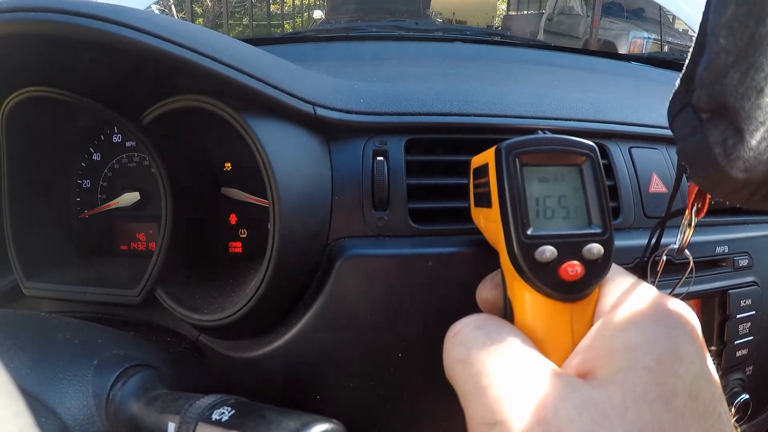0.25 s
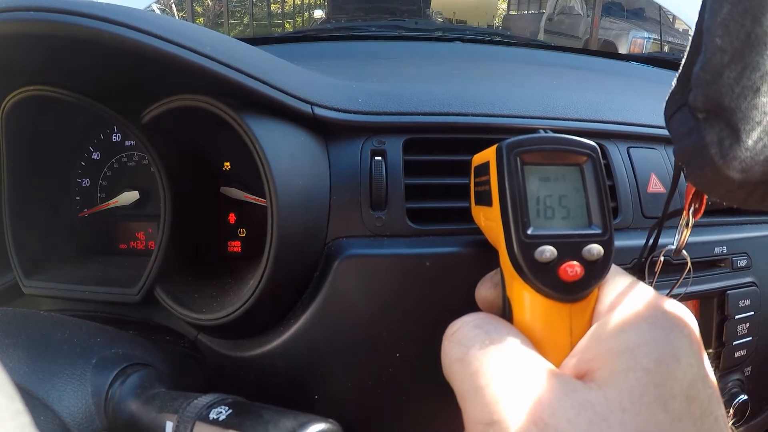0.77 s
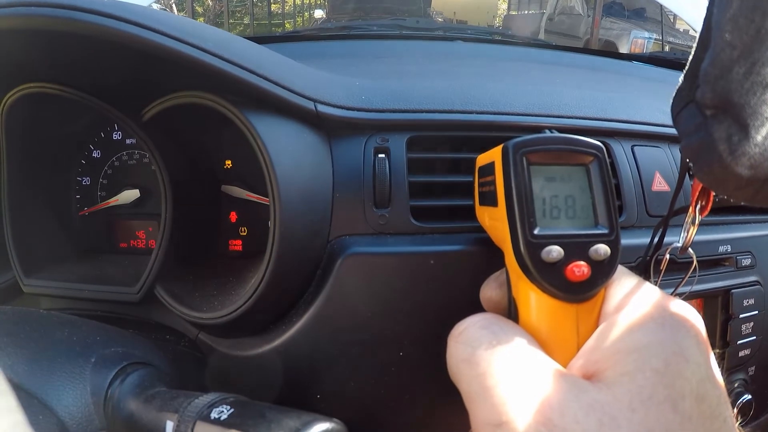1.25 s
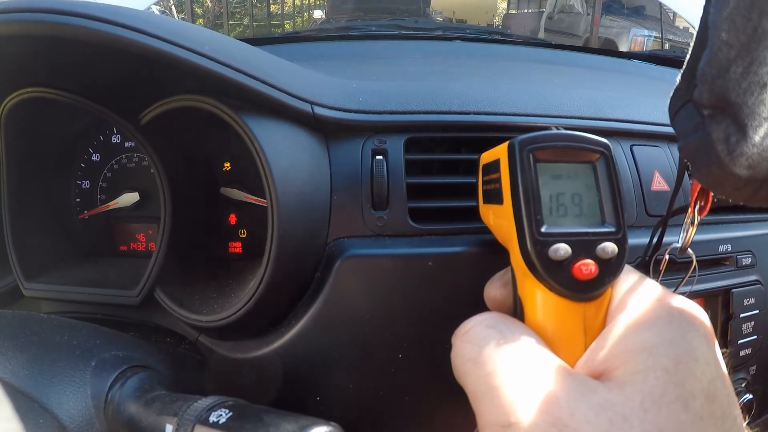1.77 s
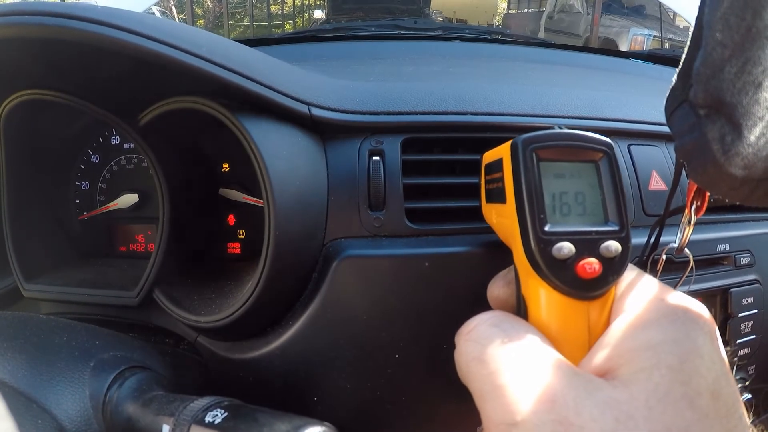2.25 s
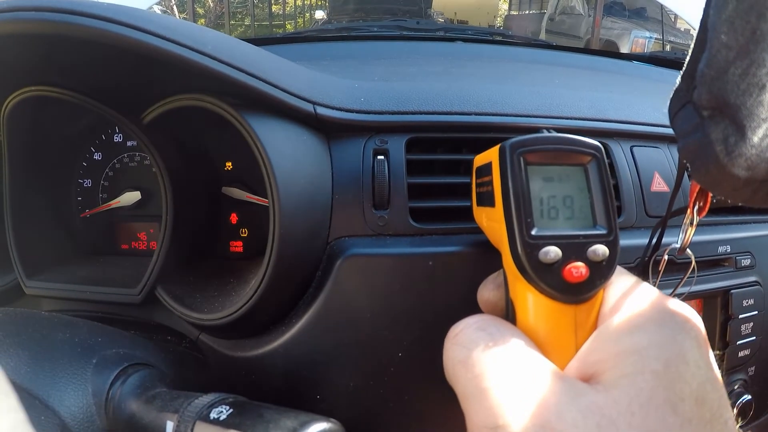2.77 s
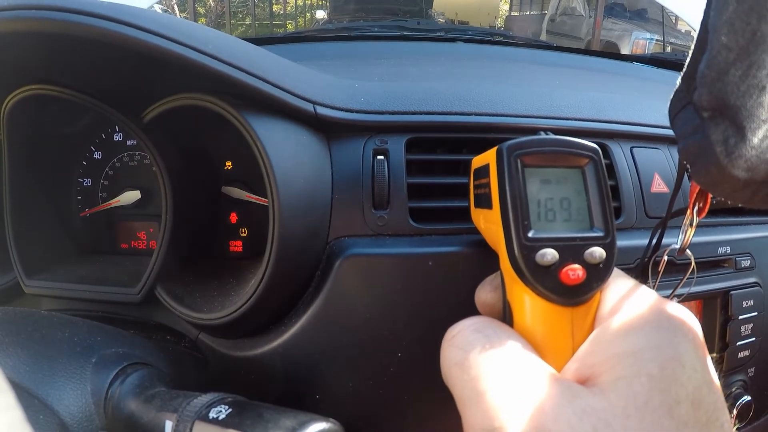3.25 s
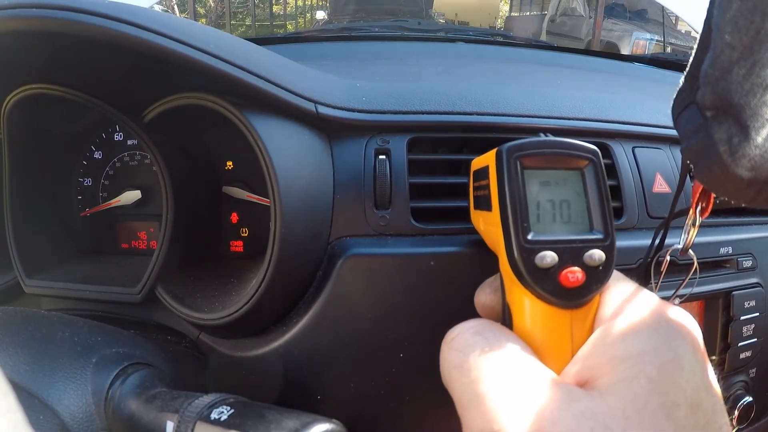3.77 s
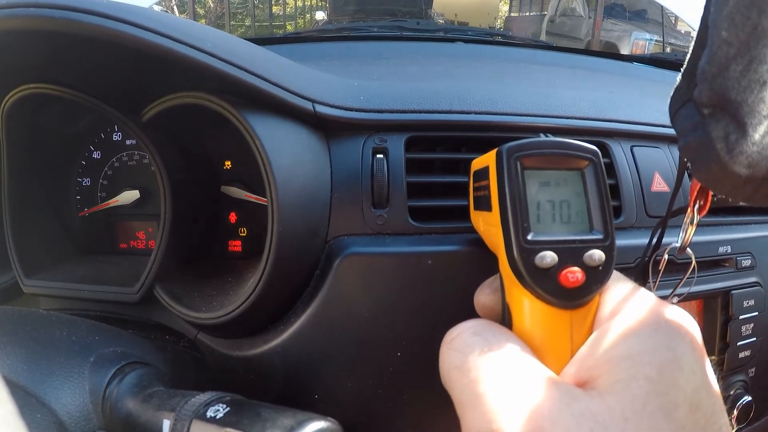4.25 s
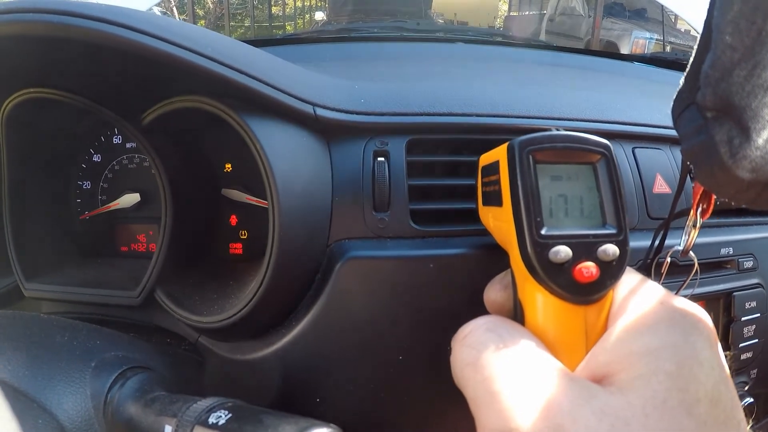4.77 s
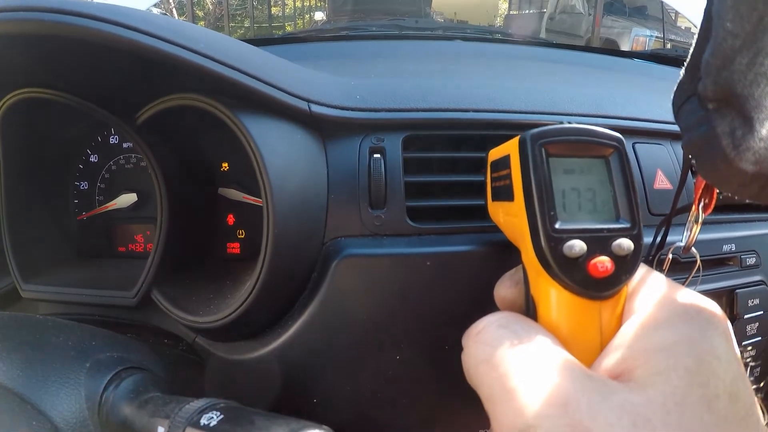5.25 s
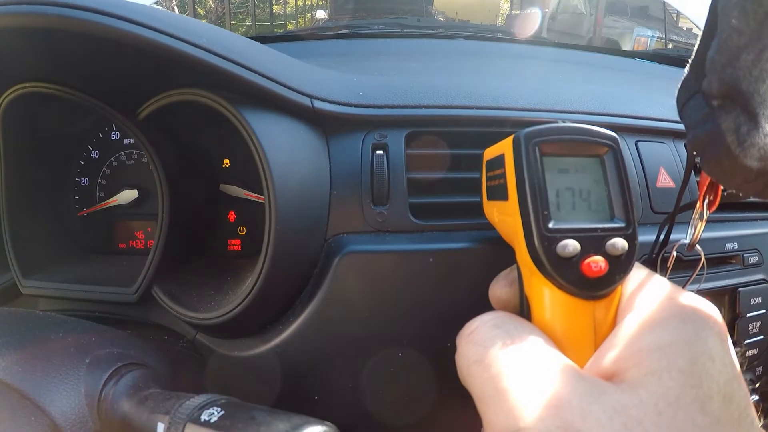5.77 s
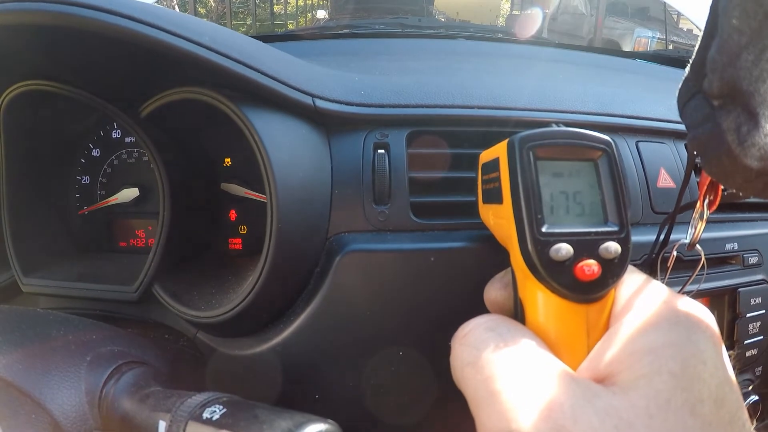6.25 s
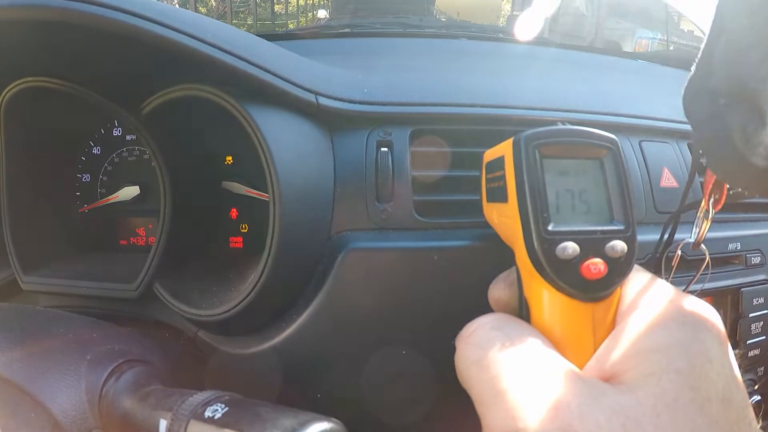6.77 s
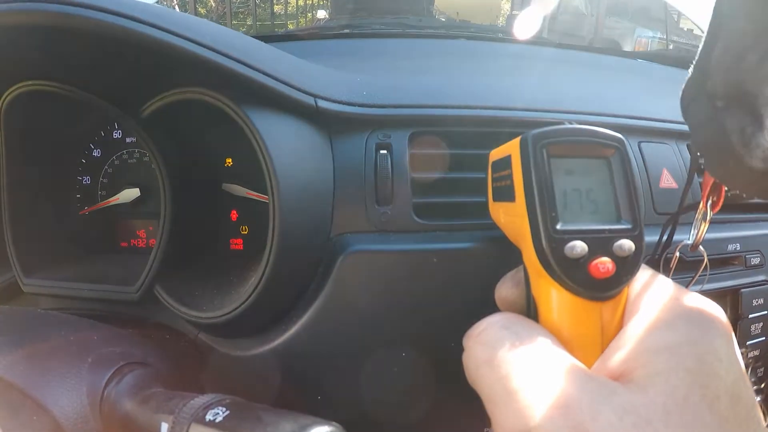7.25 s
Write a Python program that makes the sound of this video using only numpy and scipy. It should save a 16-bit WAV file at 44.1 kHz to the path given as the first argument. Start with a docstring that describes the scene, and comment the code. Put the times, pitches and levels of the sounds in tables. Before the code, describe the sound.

A car heater fan blows on high for about 7.5 seconds, already running at the start and cut off still running. The airstream strikes a close microphone: a loud, deep, uneven rumble, mostly below 100 Hz, squashed on its swells, with ragged fluttering around 150 to 400 Hz. A dense burst of hard puffs and thumps opens the first 0.15 s. From 0.2 to 2 s scattered dull pops continue, thinning near 2 s. Buffeting builds from 2.3 s and is thickest at 2.8 to 4.4 s, with heavy thumps around 3.5 to 4 s. It calms from 4.7 to 5.6 s, then flutters again, with sharper gusts near 6.3, 6.7 and 6.9 s, and fades back at the end. Constantly beneath: a steady blower hum near 123 Hz with faint higher tones, smooth soft vent hiss, a barely perceptible thin whistle and a tiny treble motor buzz. Dry, mono, enclosed cabin.

```python
"""Inside a parked car the heater fan runs on high, and air from a dash vent buffets the microphone.
The air stream is shaped noise: a swaying rumble and ragged eddies, with single puffs (crack on thump).
The blower hums as sines on its shaft orders, each wavering in level. The vents hiss as filtered noise
with a faint whistle, and a small motor ticks in the treble as decaying spits of noise."""
import sys
import numpy as np
from scipy import signal
from scipy.fft import rfft, irfft, next_fast_len
from scipy.io import wavfile
from scipy.ndimage import uniform_filter1d, minimum_filter1d

SR = 44100
rng = np.random.default_rng(int(sys.argv[2]) if len(sys.argv) > 2 else 0)


def put_to_file(sound):
    """Save the sound as 16-bit audio at rate SR, in the file named by the first command-line argument."""
    columns = np.atleast_2d(sound).T  # one column per channel
    safe = np.clip(columns, -1, 1)
    whole_steps = np.round(safe * 32767)
    wavfile.write(sys.argv[1], SR, whole_steps.astype(np.int16))


N = 331632  # length in samples

# air stream on the microphone: time_s, eddy_level_db, rumble_level_db (before the drive),
# raggedness (0-2, scales the bursts)
AIR_STREAM = [(0.0, -18.5, -7, 0.86), (0.12, -22.5, -12, 1), (0.25, -30, -10.5, .8), (0.7, -29, -16, 0.65),
              (1.2, -29, -9, 0.71), (1.6, -30.5, -11, .7), (1.95, -35, -11.5, 0.72), (2.3, -27.5, -14, 1),
              (2.8, -23.5, -8.5, 0.81), (3.3, -26.5, -11.5, 0.91), (3.9, -25.5, -13.5, 0.9),
              (4.4, -23.5, -10, 0.89), (4.7, -31.5, -12, 0.55), (5.2, -32.5, -13.5, .4),
              (5.7, -26, -12, 0.49), (6.1, -28, -13.5, 0.76), (6.55, -29.5, -12, 0.87),
              (6.75, -27.5, -10.5, 1), (7.1, -30.5, -12, .6), (7.52, -40.5, -15, .6)]
# short gusts that lift the eddies, or lower them where negative: centre_s, half_length_s, rise_db
EDDY_GUSTS = [(0.083, 0.05, 1), (2.325, 0.041, 5), (2.935, 0.017, 3.5), (3.798, .06, -3), (6.34, 0.033, 5),
              (6.696, 0.019, 12.5), (6.922, 0.014, 8)]
# noise spectrum of the rumble: frequency_hz, relative_level_db (per Hz)
RUMBLE_SPECTRUM = [(6, -20.5), (9, -7), (20, -2), (35, -2), (60, -5.5), (100, -11), (160, -20), (300, -34),
                   (600, -57)]
# noise spectrum of the eddies: frequency_hz, relative_level_db (per Hz)
EDDY_SPECTRUM = [(50, -10), (90, -9.5), (150, 0.5), (250, -1), (400, -6.5), (700, -15.5), (1100, -31),
                 (1600, -36), (2500, -73.5), (5000, -65)]
# strongest puffs of air on the capsule: peak_s, crack_peak_db, crack_pitch_hz, thump_db
STRONG_PUFFS = [(0.022, -23, 800, -24), (0.045, -22.5, 620, -21), (0.052, -24.5, 1010, -26),
                (0.066, -20, 1000, -22), (0.074, -20.0, 860, -20.0), (0.08, -23, 900, -24),
                (0.09, -14.5, 710, -10.5), (0.108, -17.5, 800, -13), (0.127, -21.5, 770, -13),
                (0.185, -23, 790, -33), (0.192, -28.5, 790, -25), (0.316, -20.5, 676, -27.0),
                (0.385, -22.5, 640, -21), (0.397, -28, 630, -31.0), (0.426, -26, 850, -17.0),
                (0.481, -21.5, 660, -22), (0.541, -27.0, 680, -36.0), (0.565, -25, 680, -32),
                (0.641, -29, 780, -25), (0.649, -18.5, 640, -28), (0.713, -29, 760, -28.0),
                (0.722, -21, 730, -17), (0.731, -23.0, 830, -31), (0.783, -24, 680, -21),
                (0.81, -24, 750, -20), (0.854, -25, 830, -33), (0.902, -19, 730, -16),
                (0.91, -25, 814, -21), (0.93, -29, 950, -33), (0.941, -18, 840, -21),
                (0.978, -27.0, 760, -42), (1.072, -25, 680, -20), (1.123, -23.5, 710, -24.0),
                (1.233, -19, 640, -26), (1.308, -29, 1070, -32.0), (1.315, -23, 780, -16),
                (1.328, -27.0, 920, -36), (1.394, -23, 620, -28.0), (1.408, -29, 710, -21.0),
                (1.446, -26.0, 860, -30), (1.523, -26.0, 730, -36), (1.63, -22, 720, -22.0),
                (1.703, -26, 740, -24.0), (1.723, -20, 740, -33.0), (1.732, -27, 700, -19),
                (1.783, -25.5, 780, -18), (2.08, -24, 630, -18), (2.142, -18.5, 685, -16.5),
                (2.209, -23.0, 660, -30.0), (2.305, -24, 630, -12), (2.318, -25, 650, -25),
                (2.328, -27, 616, -23.0), (2.335, -33, 724, -16), (2.425, -26, 670, -36),
                (2.52, -28, 620, -22), (2.583, -29, 660, -31.0), (2.608, -21, 694, -13.5),
                (2.733, -27, 630, -24.0), (2.775, -26, 660, -18), (2.836, -32, 750, -17),
                (2.881, -27, 860, -24), (2.927, -30, 620, -10.5), (2.936, -25, 660, -22.0),
                (2.952, -17, 694, -21.0), (3.018, -20, 810, -20), (3.052, -30, 620, -27.0),
                (3.125, -25, 760, -31.0), (3.208, -22, 740, -19), (3.251, -29, 710, -28),
                (3.283, -22, 740, -13), (3.301, -20, 820, -28), (3.331, -26.0, 1040, -17),
                (3.366, -24.0, 640, -25), (3.377, -16.5, 684, -12.5), (3.479, -18.0, 780, -8),
                (3.49, -23, 690, -29), (3.534, -24, 640, -28.0), (3.541, -27, 715, -29),
                (3.554, -25, 710, -14), (3.577, -20, 800, -33), (3.588, -28, 950, -19.0),
                (3.637, -22, 850, -18), (3.649, -29, 630, -32), (3.657, -21, 640, -16.5),
                (3.681, -22, 770, -26.0), (3.744, -21.0, 710, -11), (3.781, -20.0, 1000, -9),
                (3.811, -28, 750, -21), (3.832, -19.5, 885, -27), (3.853, -22.0, 700, -23),
                (3.879, -18.5, 780, -13), (3.914, -19.5, 710, -36), (3.948, -29, 720, -18),
                (3.989, -23.0, 720, -17), (3.997, -17.5, 750, -27), (4.038, -19, 800, -9.5),
                (4.101, -23, 640, -21), (4.138, -19.5, 670, -18), (4.197, -20.5, 880, -25.0),
                (4.23, -21, 650, -13), (4.249, -24.5, 800, -20), (4.256, -27, 770, -31.0),
                (4.365, -25, 840, -27), (4.376, -27, 850, -24.0), (4.468, -24, 860, -18.0),
                (4.538, -22, 660, -25.0), (4.691, -23, 690, -26), (4.709, -23, 720, -26),
                (4.882, -25.0, 750, -34), (4.919, -26, 820, -16.5), (4.933, -31, 640, -31),
                (5.058, -25, 680, -21), (5.077, -32, 800, -36), (5.097, -26.0, 640, -30),
                (5.128, -25, 650, -29), (5.228, -26, 780, -35), (5.316, -28, 720, -29.0),
                (5.323, -23.0, 620, -22), (5.413, -25.0, 640, -32), (5.445, -22, 750, -31.0),
                (5.469, -28, 774, -36), (5.506, -26.0, 680, -34), (5.567, -26, 860, -36),
                (5.712, -27, 690, -22.0), (5.959, -24, 660, -21), (6.133, -22, 640, -25.0),
                (6.15, -26, 720, -20), (6.292, -17.0, 790, -24), (6.327, -26, 950, -19),
                (6.34, -23.0, 840, -20), (6.397, -24, 900, -28), (6.404, -19.5, 740, -29),
                (6.449, -28, 930, -30), (6.642, -25, 970, -36), (6.676, -26, 660, -28),
                (6.686, -23, 880, -30.0), (6.694, -19, 770, -18), (6.707, -24, 700, -15.0),
                (6.763, -25, 840, -23), (6.811, -27, 1060, -12.5), (6.915, -22.5, 1100, -18),
                (6.973, -26.0, 880, -25)]
# multiples of the shaft rate at which the blower hums: order
HUM_ORDERS = [4, 8, 12, 14, 17, 20, 28, 40, 44, 58, 68, 70, 84]
# blower hum, one row for each order: level_db, waver_db, follow (dB gained per dB of duct swell)
HUM_LEVELS = [(-18, 2, 0.5), (-42.5, 2.5, 0), (-39.5, 3.2, 0.65), (-49.5, 2, 0.5), (-48.5, 2.2, 3),
              (-49, 2.5, 3.5), (-55, 2, 2), (-53.5, 1.5, -0.5), (-56.5, 2, -3), (-66, 1.5, -1),
              (-72.5, 0.5, -3), (-66, 2, 0), (-70.5, -1.5, -0.5)]
# slow swell of the low duct hiss: time_s, level_db
DUCT_SWELL = [(0, -38.5), (1.2, -38), (2.7, -35.5), (4.2, -38.5), (4.7, -37), (5.2, -35.5), (5.8, -36.5),
              (6.4, -39), (7.52, -38.5)]
# low hiss of the ducts: frequency_hz, relative_level_db (per Hz)
DUCT_SPECTRUM = [(240, -40.5), (400, -4), (470, -2.5), (665, -7.5), (800, -1), (930, -4), (1080, -10),
                 (1500, -17), (1950, -36.5), (3300, -120)]
# hiss shaped by the louvres: frequency_hz, relative_level_db (per Hz)
LOUVRE_SPECTRUM = [(880, -18.5), (1200, -2), (1550, -2.5), (1700, -5), (1990, -7.5), (2230, -4.5),
                   (2420, -6), (2640, -5.5), (3600, -13), (3900, -12.5), (4320, -17.5), (4970, -16.5),
                   (7500, -30), (9750, -58.5), (16500, -120)]
# slow swell of the top octave of the hiss: time_s, level_db
SHEEN_SWELL = [(0.0, -56.5), (0.15, -71), (0.67, -63), (2.55, -60), (4.25, -63.5), (5.45, -60), (7.27, -64),
               (7.52, -62)]
# top octave of the hiss: frequency_hz, relative_level_db (per Hz)
SHEEN_SPECTRUM = [(3530, -24.5), (6000, -1), (8200, -4), (9900, -4.5), (11800, -12.5), (15300, -48),
                  (22000, -120)]

RUMBLE_DRIVE_DB, RUMBLE_SWAY_DB = 4.5, 3  # drive into the limiter; random sway
PUFF_MS, THUMP_HZ, SMOOTH_HZ = 3.8, 350, 2000  # decay of a crack; middle thump pitch; top of a crack
CRACKLE_PER_S, CRACKLE_HZ = 95, 560  # rate of small puffs; pitch before scatter
CRACKLE_UNDER_DB, CRACKLE_SPREAD_DB = 3.5, 5.5  # loudest peak under the eddy level; scatter below it
SHAFT_HZ = 30.82
LOUVRES_DB = -43.5
WHISTLE_HZ, WHISTLE_DB = 5680, -78
TICK_HZ, TICK_DB = 127.6, -69
CEILING, FADE_S, TOP_HZ = 0.97, 0.004, 15700  # peak ceiling (full scale 1); edge fades; top cut


def stream():
    """Turbulence on the capsule: a rumble, and smaller eddies that come in ragged bursts."""
    t = np.arange(N) / SR
    eddy_db, rumble_db, ragged = curve(AIR_STREAM)
    gust_db = sum(rise_db * np.exp(-((t - s) / half_s) ** 2) for s, half_s, rise_db in EDDY_GUSTS)
    eddy_db = eddy_db + gust_db
    rumble_db = rumble_db + RUMBLE_DRIVE_DB + RUMBLE_SWAY_DB * walk(9)
    rumble = undb(rumble_db) * colour(rng.standard_normal(N), RUMBLE_SPECTRUM)
    # every band of the eddies bursts together, on two time scales
    burst_db = np.clip(ragged, 0, 2) * (2.3 * walk(25) + 1.8 * walk(160))
    eddies = colour(undb(burst_db) * rng.standard_normal(N), EDDY_SPECTRUM)
    return rumble + undb(eddy_db) * eddies


def puffs():
    """Each puff is a short ragged crack, a sharp swing of pressure in it, on a low thump."""
    out = np.zeros(N + 2048)
    t = np.arange(-512, 512) / SR
    rows = list(STRONG_PUFFS) + crackle()
    noise = rng.standard_normal((len(rows), len(t)))
    smooth = signal.butter(4, SMOOTH_HZ, fs=SR, output="sos")
    # the eddy comes fast and leaves slower
    swell = np.exp(-(1000 * t / np.where(t < 0, 0.55 * PUFF_MS, PUFF_MS)) ** 2)
    for (peak_s, crack_db, hz, thump_db), n in zip(rows, noise):
        # the first noise samples, silent under the swell, also scatter the phases and thump pitch
        swing = np.sin(2 * np.pi * (hz * t + n[0])) * np.exp(-(t * hz / 0.55) ** 2)
        ragged = band(n * swell, 0.45 * hz, 1.34 * hz)
        crack = signal.sosfiltfilt(smooth, swing + 1.5 * ragged)
        # centre the loudest moment and bring its envelope to 1
        power = uniform_filter1d(np.abs(signal.hilbert(crack)) ** 2, size=90)
        crack = np.roll(crack, 512 - power.argmax()) / np.sqrt(power.max())
        cycles = THUMP_HZ * undb(2.5 * n[1]) * t
        thump = np.sin(2 * np.pi * (cycles + n[2])) * np.exp(-(cycles / 1.02) ** 2)
        i = int(peak_s * SR)
        out[i:i + len(t)] += undb(crack_db) * crack + undb(thump_db) * thump
    return out[512:N + 512]  # puts each centre on its peak_s


def crackle():
    """Rows for the many small puffs between the strong ones; they follow the level of the eddies."""
    chance = rng.random((int(CRACKLE_PER_S * N / SR), 4)).T
    peak_s = chance[0] * (N - 1) / SR
    eddy_db = curve(AIR_STREAM)[0][(peak_s * SR).astype(int)]
    crack_db = eddy_db - CRACKLE_UNDER_DB - CRACKLE_SPREAD_DB * chance[1]
    pitch_hz = CRACKLE_HZ * 2 ** (1.1 * chance[2] - 0.4)
    thump_db = crack_db + 4.5 - 9 * chance[3]
    return list(zip(peak_s, crack_db, pitch_hz, thump_db))


def blower():
    """Hum on the shaft orders at a nearly steady speed; levels waver, and some follow the duct hiss."""
    turns = np.cumsum(SHAFT_HZ * (1 + 0.00153 * walk(2.494))) / SR
    phases = rng.random(len(HUM_LEVELS))
    duct_db = curve(DUCT_SWELL)[0]
    swell_db = duct_db - np.mean(duct_db)
    hum = np.zeros(N)
    for order, (level_db, waver_db, follow), phase in zip(HUM_ORDERS, HUM_LEVELS, phases):
        level = undb(level_db + waver_db * walk(8) + follow * swell_db)
        hum += np.sqrt(2) * level * np.sin(2 * np.pi * (order * turns + phase))
    return hum


def vents():
    """Smooth hiss from the ducts and louvres; its top octave swells and sinks slowly."""
    duct_level = undb(curve(DUCT_SWELL)[0] + 0.67 * walk(7.3))
    ducts = duct_level * colour(rng.standard_normal(N), DUCT_SPECTRUM)
    louvre_level = undb(LOUVRES_DB + 0.36 * walk(7.4))
    louvres = louvre_level * colour(rng.standard_normal(N), LOUVRE_SPECTRUM)
    sheen_level = undb(curve(SHEEN_SWELL)[0] + 0.54 * walk(9))
    sheen = sheen_level * colour(rng.standard_normal(N), SHEEN_SPECTRUM)
    # a slit somewhere in the ducts whistles faintly: a narrow band of noise
    whistle = unit(band(rng.standard_normal(N), WHISTLE_HZ - 35, WHISTLE_HZ + 35))
    return ducts + louvres + sheen + undb(WHISTLE_DB) * whistle


def ticks():
    """A faint, even buzz in the treble: a short spit of noise once a cycle, as of motor brushes."""
    phase = (TICK_HZ * np.arange(N) / SR) % 1
    spit = np.exp(-phase / 0.09) * rng.standard_normal(N)
    return undb(TICK_DB) * unit(band(band(spit, 4200, 9500), 3500, 10500))


def undb(db):
    """Decibels to amplitude."""
    return 10 ** (np.asarray(db) / 20)


def unit(x):
    """Scale x to rms 1."""
    return x / np.sqrt(np.mean(x ** 2))


def curve(table):
    """Draw each column of a timed table as a line through its points, one value per sample."""
    s, *columns = np.transpose(table)
    return [np.interp(np.arange(N) / SR, s, c) for c in columns]


def colour(x, spectrum):
    """Shape x by a spectrum table, straight in dB over log frequency; rms 1."""
    size = next_fast_len(N)
    hz, db = np.transpose(spectrum)
    f = np.maximum(np.arange(size // 2 + 1) * SR / size, 1)
    gain = undb(np.interp(np.log(f), np.log(hz), db, left=-90, right=-120))
    return unit(irfft(rfft(x, size) * gain, size)[:N])


def walk(rate_hz):
    """Random levels held 1 / rate_hz seconds and slewed twice; rms 1."""
    hold = int(SR / rate_hz)
    steps = np.repeat(rng.standard_normal(N // hold + 1), hold)
    return unit(uniform_filter1d(uniform_filter1d(steps, hold), hold)[:N])


def band(x, lo_hz, hi_hz):
    """Keep the band between two frequencies."""
    return signal.sosfilt(signal.butter(2, [lo_hz, hi_hz], "bandpass", fs=SR, output="sos"), x)


def scene():
    """Mix of all sources, one channel."""
    return (stream() + puffs() + blower() + vents() + ticks())[None]


def record(dry):
    """A limiter holds down the bass swells and leaves the treble; peaks round off; the top is cut."""
    bass = signal.sosfiltfilt(signal.butter(2, 160, fs=SR, output="sos"), dry)
    held_peak = -minimum_filter1d(-np.abs(bass), size=700)
    bass_level = uniform_filter1d(held_peak, size=500) + 1e-9
    gain = np.minimum(1, (0.46 / bass_level) ** 0.57)
    out = dry - bass + gain * bass
    out = out / (1 + (out / CEILING) ** 6) ** (1 / 6)
    t = np.arange(N) / SR
    edge = np.clip(np.minimum(t, t[-1] - t) / FADE_S, 0, 1)
    out = out * np.sin(np.pi / 2 * edge) ** 2
    return signal.sosfiltfilt(signal.ellip(6, 0.1, 40, TOP_HZ, fs=SR, output="sos"), out)


dry = scene()
out = record(dry)
put_to_file(out)
```